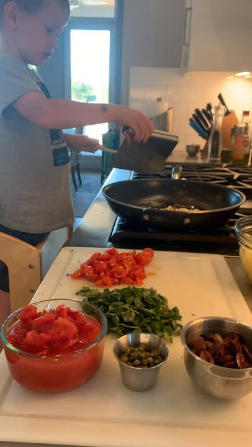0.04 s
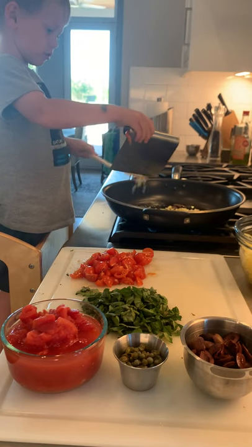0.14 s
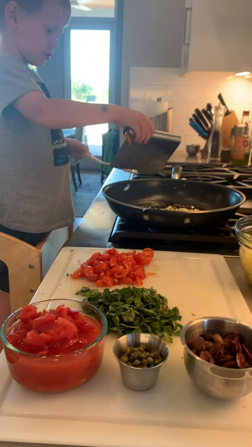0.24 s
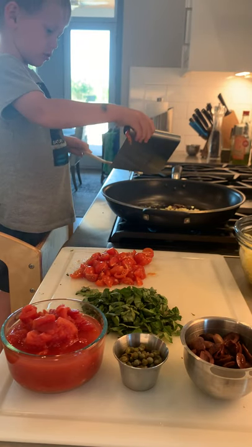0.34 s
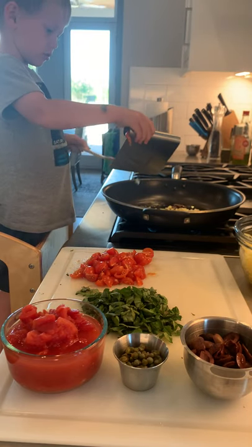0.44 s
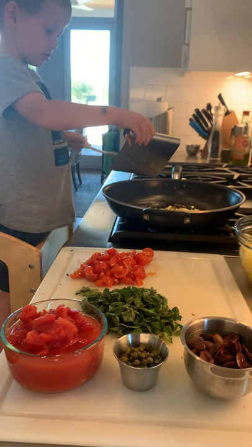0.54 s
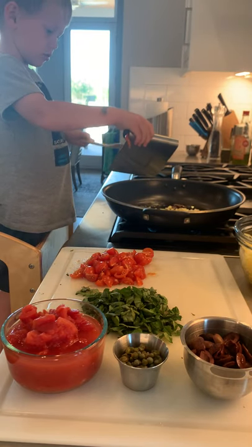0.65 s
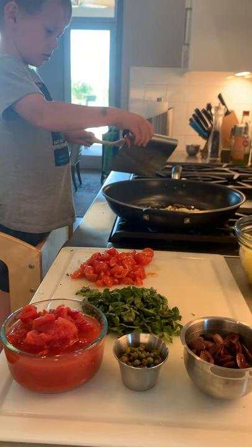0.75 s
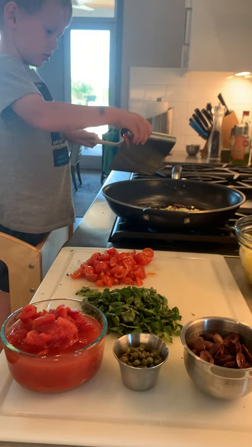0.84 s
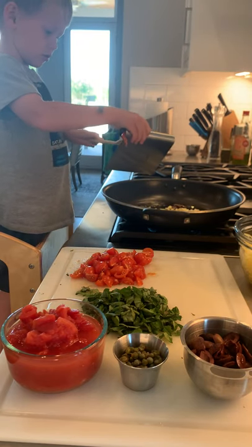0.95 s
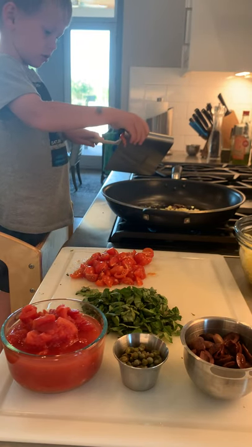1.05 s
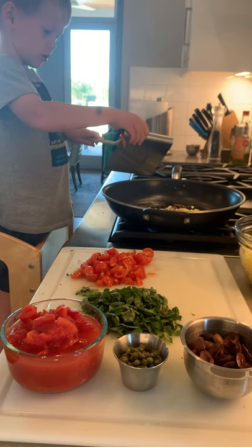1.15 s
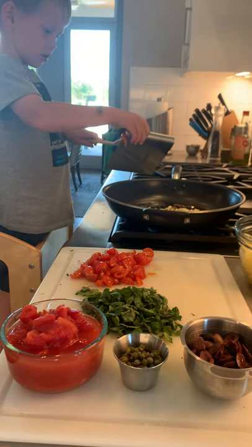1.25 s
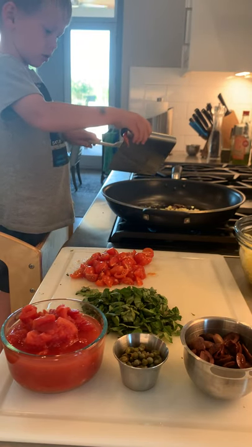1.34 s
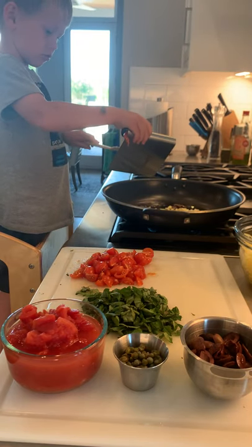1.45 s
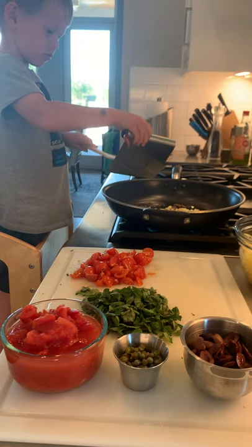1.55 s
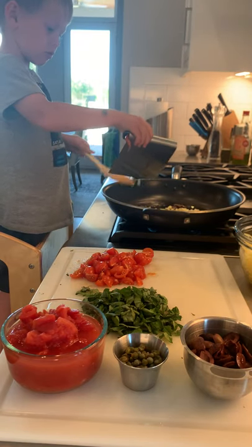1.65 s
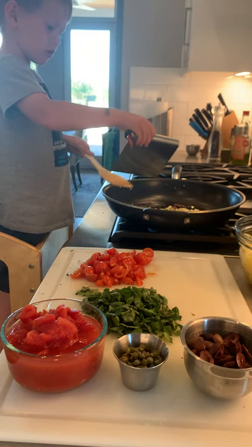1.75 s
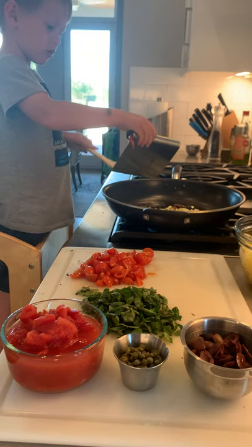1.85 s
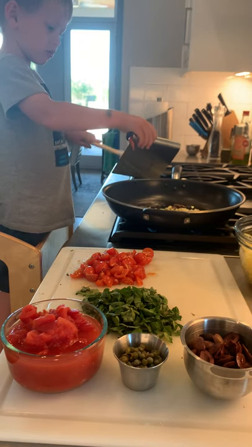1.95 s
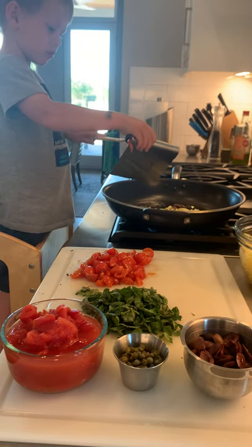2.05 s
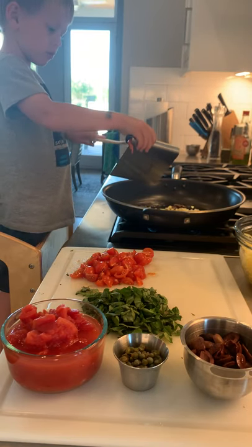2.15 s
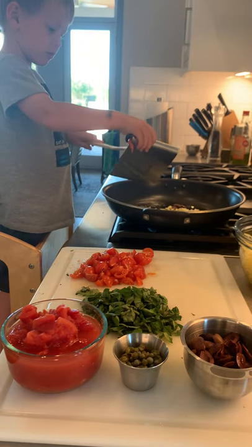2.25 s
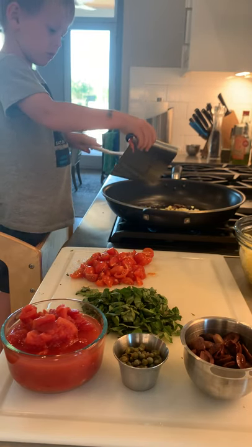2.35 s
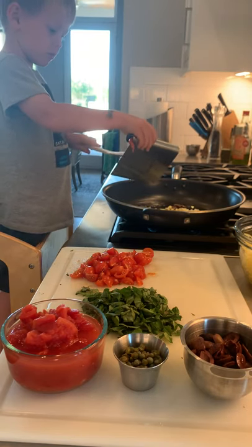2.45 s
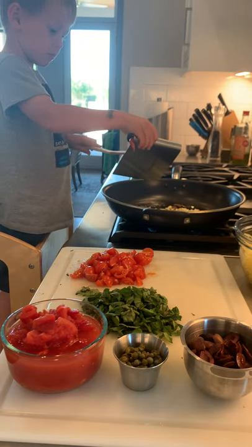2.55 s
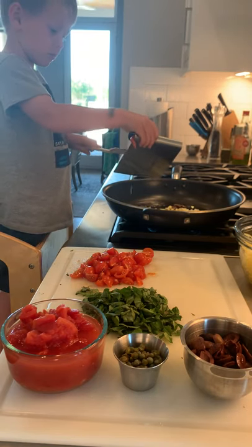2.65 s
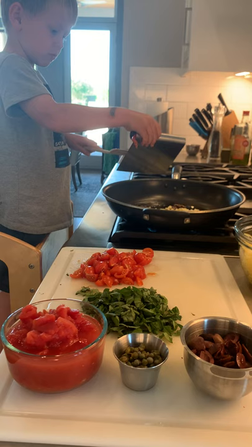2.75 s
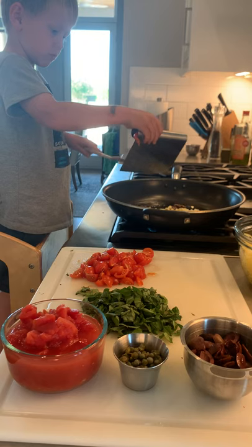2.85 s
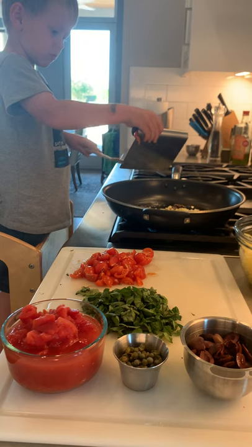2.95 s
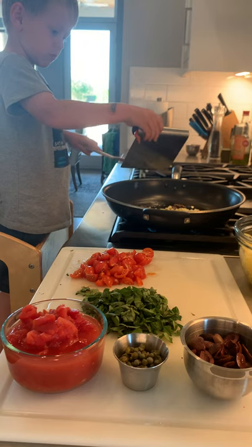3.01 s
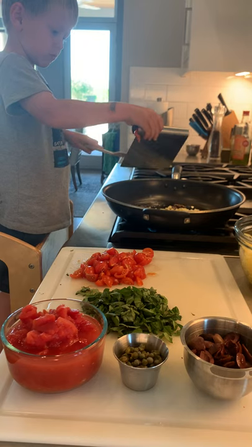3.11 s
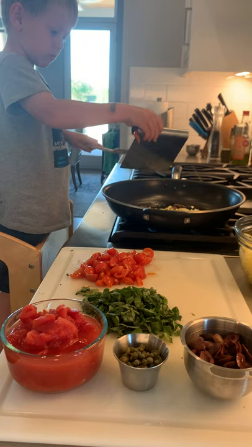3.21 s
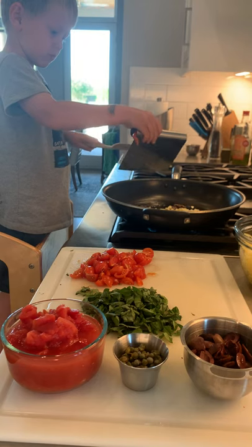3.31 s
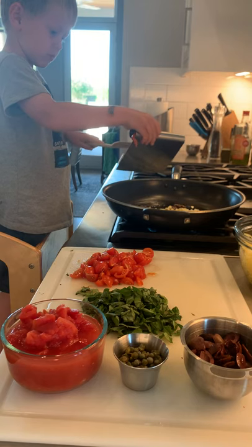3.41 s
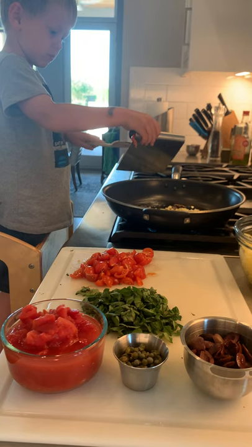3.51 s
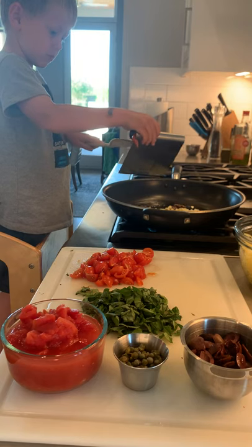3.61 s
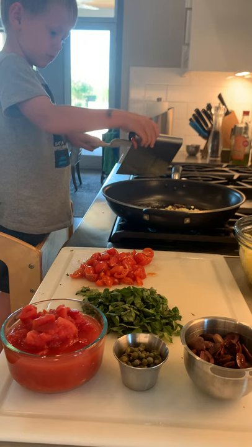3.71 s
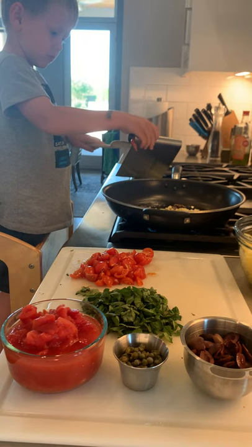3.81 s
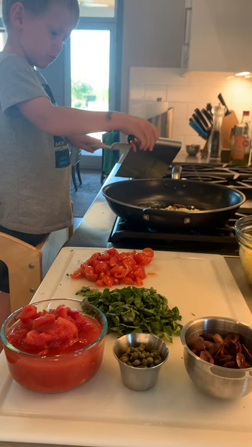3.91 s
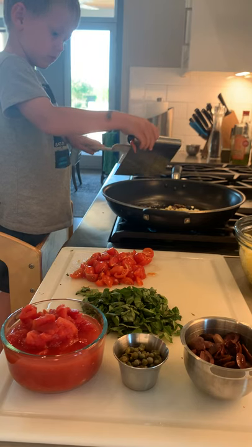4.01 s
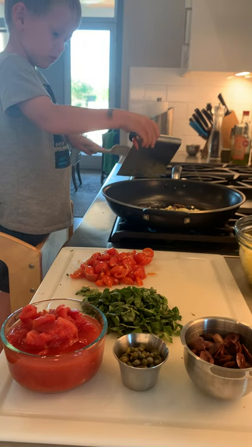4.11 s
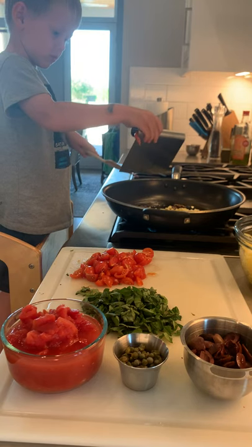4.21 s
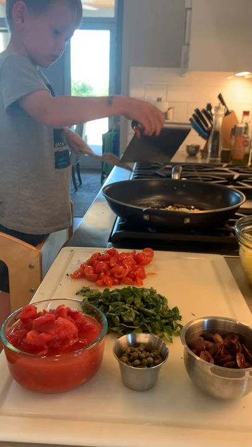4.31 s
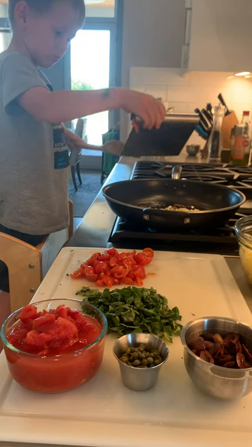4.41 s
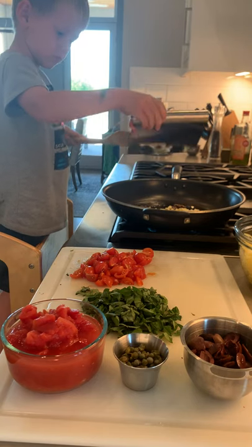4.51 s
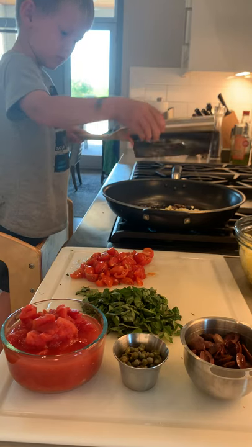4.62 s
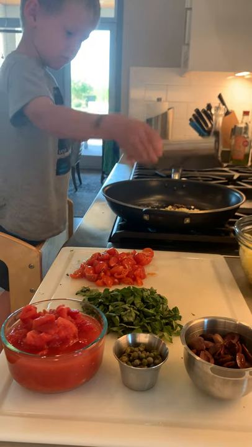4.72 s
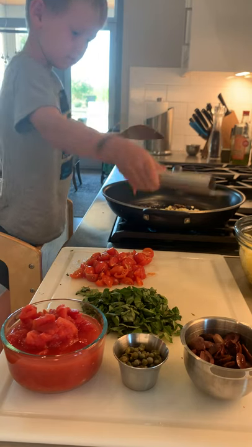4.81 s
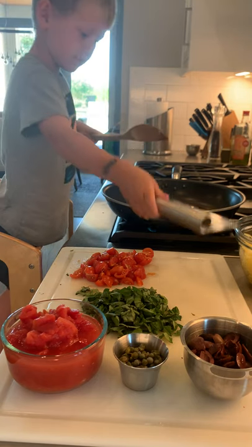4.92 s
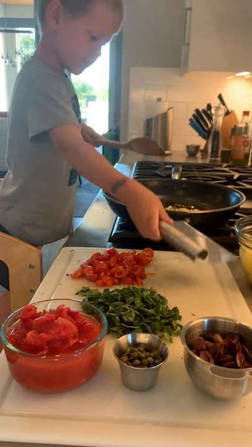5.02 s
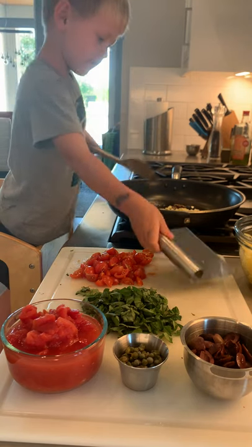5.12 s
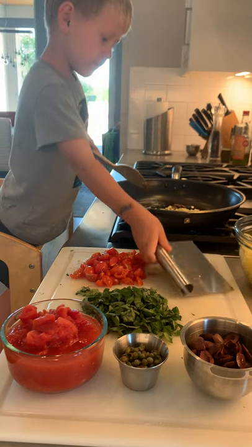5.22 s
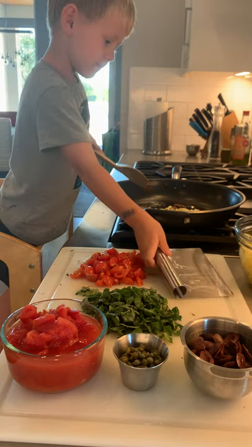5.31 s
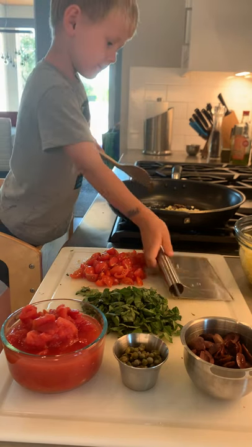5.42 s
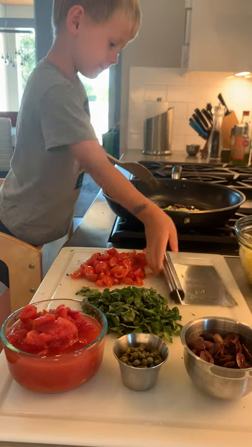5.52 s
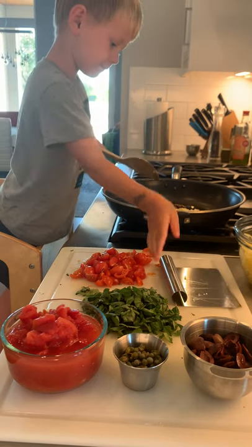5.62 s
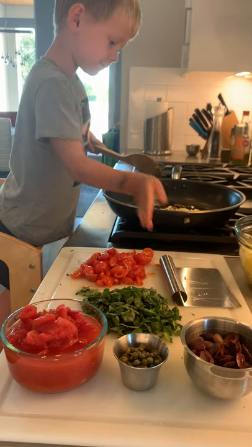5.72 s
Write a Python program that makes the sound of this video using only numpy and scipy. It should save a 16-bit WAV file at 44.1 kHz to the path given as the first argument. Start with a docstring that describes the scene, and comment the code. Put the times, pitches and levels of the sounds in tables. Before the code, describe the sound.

Over a faint house rumble, soft gritty strokes and irregular ticks sound on a thin steel blade, building to a quick cluster of bright taps. Quieter scrapes continue among three dull, distant wooden knocks, the first clearly loudest. A small ware rattle and a barely audible thin ring lead to the loud metallic clatter and thud of the scraper landing on a board. The room is echoing; the stereo microphone is near the board.

```python
"""A home kitchen over a low house rumble. From the start a wooden spoon wipes and taps a steel scraper: grains
and blows ring the held blade's modes, and a thin high ring joins the taps at 2.0 s. Three dull wooden knocks
follow further off, each with two rebounds, then a rattling clink of ware and at 4.96 s a lower thin ring.
Last the scraper is laid on a chopping board, where it slides and clatters flat, adding the board's thud.
Dense wall echoes follow every source except the thin rings; two microphone ports hear it all."""
import sys
import numpy as np
from scipy import signal
from scipy.fft import rfft, irfft
from scipy.io import wavfile
from scipy.ndimage import uniform_filter1d, map_coordinates

SR = 44100
rng = np.random.default_rng(int(sys.argv[2]) if len(sys.argv) > 2 else 0)


def write(x):
    x = np.atleast_2d(x).T
    wavfile.write(sys.argv[1], SR, np.round(np.clip(x, -1, 1) * 32767).astype(np.int16))


N = 254081

# House noise spectrum. Each row: frequency in Hz, relative level per Hz in dB.
HOUSE_SPECTRUM = [(25, -25.5), (60, 1.5), (120, 2.5), (200, -6), (300, -10.5), (500, -25.5), (750, -28),
                  (1020, -34), (1300, -29.5), (1650, -26), (2100, -44.5), (2800, -44), (4500, -44),
                  (8000, -46.5), (15000, -47)]
# Kitchen reverberation. Each row: frequency in Hz, time to fall 60 dB in seconds.
ROOM_DECAY = [(150, 0.56), (500, 0.58), (1500, 0.8), (4000, 0.76), (10000, 0.35)]
# Microphone ports. Each row: frequency in Hz, phase by which left leads in radians, likeness of the ports
# from 0 to 1, left minus right in dB.
MIC_PORTS = [(0, 0, .998, -.3), (60, -.14, .995, -1.2), (125, -.25, .985, -1.8), (300, -.6, .92, -.3),
             (700, -.6, .62, -2.2), (1700, 0, .55, -3), (2400, 1, .4, -3.5), (3050, 2.3, .75, -2),
             (3700, 1.6, .7, -1), (4300, 2, .7, 0), (5200, 3.14, .92, 0), (7600, 6.1, .94, 0),
             (9400, 6.45, .94, 0), (11300, 9.3, .96, 0), (13400, 9.55, .96, 0), (15000, 12.4, .99, 0)]
# Band centres in Hz for colouring each contact; the band at 2100 Hz is the level reference.
BAND_CENTRES_HZ = [45, 200, 800, 2100, 3900, 6500, 9500, 14500]
# Treble of each kind of contact against the reference band, before slope and lift. Each entry: level in dB
# at 3-5 kHz, at 5-7.5 kHz, at 8-11 kHz and above 11 kHz.
TREBLE_DB = dict(tap=(-5, 1, -7.5, -2.5), wipe=(-2, -1, -4.5, -12.5), swing=(0, -3, 4, 19),
             knock=(-6, -12.5, -26, -41), clink=(1.5, 1, -7, -18), landing=(-4, -1.2, -1, -5),
             slide=(-3, 0.5, -3, -8))

# Modes of each body. Each row: frequency in Hz, level in dB before chance and favouring,
# time to fall 60 dB in seconds before damping.
WOOD_MODES = [(590, -4, 0.13), (811, -12, 0.047), (1070, 6, 0.032), (1294, 4.5, 0.041), (1507, 3.5, 0.038),
              (1716, 3.5, 0.073), (1910, -5, 0.048), (2030, 0, 0.12), (2540, -1, 0.06), (3260, 0, 0.03),
              (4780, -31, 0.033)]  # something wooden across the room
WARE_MODES = [(672, -4, 0.037), (886, -3, 0.096), (1105, 1, 0.075), (1250, 3, 0.037), (1526, -4.5, 0.034),
              (2046, 8, 0.083), (2566, 3.5, 0.14), (3340, -16, 0.056), (3750, -3, 0.06), (4140, 3.5, 0.19),
              (4230, -3, 0.13), (4730, 6, 0.052), (5360, 8, 0.058), (5680, 1, 0.12), (5760, -12, 0.04),
              (7450, 1.5, 0.067), (9350, 1, 0.06), (12300, -7, .06)]  # ware across the room
HELD_MODES = [(601, -7, 0.11), (726, -6.5, 0.076), (872, -2, 0.15), (961.4, 1, 0.22), (1074, -3, 0.093),
              (1210, -4, 0.0785), (1435, -1.5, 0.029), (1583, 0.5, 0.11), (1830, -5, 0.06),
              (2003, -2.5, 0.13), (2222, 10, 0.04), (2443, 3.5, 0.075), (2650, -8.5, 0.051),
              (3350, -2.5, 0.083), (3660, 2.5, 0.089), (3987, 5.5, 0.084), (3987, 0, 0.038),
              (4825, 1, 0.022), (6190, -4.5, 0.11), (6510, -2, 0.19), (7280, 2, 0.03), (8340, 1.5, 0.09),
              (9220, 0, 0.25), (10110, 6, 0.26), (13080, -22, 0.067)]  # blade held in the hand
THIN_MODES = [(2190, -5, 0.72), (3600, 7, 0.57), (4936, 13, 0.16), (5860, 0, 0.36), (7450, -8, .12),
              (8550, -18, 0.33)]  # thin, mostly long rings of the blade
LAID_MODES = [(122.5, 3, 0.22), (87, -4.5, 0.13), (185, -3, 0.15), (232.4, -4.5, 0.11), (341, -12, 0.033),
              (413, 5.5, 0.082), (535, -2, 0.2), (711, -4, 0.056), (859, 6.5, 0.06), (1075, 6.5, 0.049),
              (1411, 5, 0.079), (1513, 8, 0.067), (2065.4, 4.5, 0.16), (2184, 1.5, 0.14),
              (2513, -0.5, 0.36), (2840, -4, 0.17), (3146, 6, 0.21), (3330, 1, 0.25), (3804, 0.5, 0.27),
              (4230, -5.5, 0.25), (5400, -18, 0.044), (6030, 9, 0.066), (6600, 0, 0.089), (7360, -8, 0.09),
              (8200, 5, 0.08), (8570, -6, 0.1), (8990, -10, 0.13), (11100, 0, 0.051), (12800, -14, 0.064)]  # blade on the chopping board

# Dull knocks across the room. Each row: start in seconds, peak at 1.5-3 kHz in dB, level against it at
# 0.5-1.3 kHz in dB, treble slope in dB per octave, favoured mode in Hz, rebound spacing in ms.
KNOCK_EVENTS = [(2.3895, -31.5, -2, -4.5, 1645, 9.1), (3.1309, -54.5, 5, -16.5, 1310, 6.4),
                (3.9683, -54.5, 9, -17, 596, 8.9)]
# Contacts of the rattling clink. Each row: start in seconds, peak at 1.5-3 kHz in dB, treble slope in dB
# per octave, contact in ms.
CLINK_EVENTS = [(4.511, -45.5, -4, 3.5), (4.5255, -52.5, 2, 21), (4.5407, -53.5, -3.5, 25),
                (4.5793, -63, -0.5, 80), (4.699, -61.5, -1, 71)]
# Spoon wiping along the blade through garlic. Each row: start in seconds, peak at 1.5-3 kHz in dB, level
# against it at 0.5-1.3 kHz in dB, treble slope in dB per octave, stroke held in ms, favoured mode in Hz.
WIPE_STROKES = [(0.015, -63, -4, -7.5, 66, 1760), (0.142, -60.5, -2, -1, 3.2, 2460),
                (0.19, -56, -1.5, -9, 25, 1820), (0.24, -67.5, 7, -3.5, 29, 1830),
                (1.1292, -72, 19, 5.5, 6.2, 980), (1.2439, -68.5, 10.5, 1, 30, 1530),
                (1.35, -60.5, -1, -5.5, 4, 1520), (1.5443, -60.5, -26, -2, 30, 1360),
                (1.70, -50.5, 9.5, 2.8, 300, 4100), (2.02, -50, 4, -10, 6.6, 2380),
                (2.262, -55.5, -5, -3.5, 9.9, 2600), (2.3274, -51, 4, -2, 6.8, 1870),
                (2.757, -64, -3, 0.5, 50, 1570), (3.0054, -67.5, -15, -1.5, 3.7, 1620),
                (3.247, -66.5, -19, 4, 5, 1320), (4.098, -67.5, -32.5, 2, 4.3, 1590),
                (4.853, -59.5, -0.5, -4.5, 5, 1300)]
# Spoon blows on the held blade. Each row: start in seconds, peak at 1.5-3 kHz in dB, level against it at
# 0.5-1.3 kHz in dB, treble slope in dB per octave, contact in ms, favoured mode in Hz.
TAP_BLOWS = [(0.105, -52, -10, -18, 8.7, 1850), (0.2232, -65.5, -21, -1.5, 2.5, 6460),
             (0.766, -59, -11, -2, 0.6, 14300), (1.0522, -46, -2, -8.5, 3.6, 2200),
             (1.1095, -51, 3, -4, 5.6, 928), (1.4108, -43.5, 2, -7, 1.45, 2240),
             (1.6714, -27, -10.5, 0.5, 0.97, 4140), (1.677, -30.5, -5, 0.5, 4.4, 2380),
             (1.8729, -45, 6.5, -11, 11, 1030), (1.8998, -30, -9, -12.5, 2.5, 1970),
             (1.9124, -38, -8, -16, 4.7, 2190), (1.921, -34.5, -9, -19, 6, 2180),
             (1.9975, -38.5, -7, -8, 3.8, 2440), (2.015, -44, -5.5, -19, 17, 2250),
             (2.3445, -55, -10, -3, 4, 4020)]
# Thin rings of the blade, one high among the taps, one lower later. Each row: start in seconds, peak at
# 1.5-3 kHz in dB, level against it at 0.5-1.3 kHz in dB, treble slope in dB per octave, contact in ms,
# favoured mode in Hz.
THIN_RINGS = [(2.003, -80.5, -20.5, 9, 8, 8600), (4.955, -73, -27, -10.5, 40, 3630)]
# Pressure points of the slide on the board. Each row: time in seconds, rms level in dB at 1.5-3 kHz,
# treble slope in dB per octave.
SLIDE_POINTS = [(5.228, -78, -5), (5.244, -46.5, -2), (5.29, -47, -3.5), (5.35, -55, -14), (5.40, -54, -9),
                (5.45, -48.5, -3.5), (5.479, -40.5, 0), (5.53, -42, -4.5), (5.56, -60, 17.5)]
# Blade striking the board. Each row: start in seconds, peak at 1.5-3 kHz in dB, level against it at
# 0.5-1.3 kHz in dB, treble slope in dB per octave, contact in ms, favoured mode in Hz,
# board thud against the peak at 90-500 Hz in dB.
BOARD_LANDINGS = [(5.225, -33, -10, -0.5, 12.6, 2200, -32), (5.2571, -32.5, -23, -5.5, 7.1, 2480, -21),
                  (5.2816, -37.5, -8, -11, 20.4, 2210, -0.5), (5.4054, -45, -9, -1.5, 14, 1390, -15),
                  (5.473, -29, -11.5, -7, 35, 1460, -32), (5.5381, -31.5, 11, -4, 7.9, 432, 3),
                  (5.5477, -18.5, -9, -2, 1.8, 1550, -6), (5.5526, -20.5, -31, -6, 7.7, 6800, -27),
                  (5.5559, -24.5, 7.5, 0, 3.4, 2053, 4.5), (5.5648, -21.5, -27, 1.5, 1.75, 8700, -3.5),
                  (5.5715, -25.5, -31, 1, 4, 2000, -15), (5.5784, -28.5, -26, -3, 2.4, 6600, -13),
                  (5.5812, -20.5, -40, -5.5, 4.6, 2070, -8.5), (5.612, -29.5, -26, -9.5, 15, 2470, -4),
                  (5.65, -39.5, -3, -4, 16, 2070, -3)]

HOUSE_DB = -53  # before its bands wander
NEARBY_FROM_HZ, NEARBY_DB = 1700, 4.0
PATH_DRIFT_MS = 0.019  # spread of the wander in path delay
MIC_TOP_HZ = 15900
LEAD_IN = 1024  # samples that keep the band edges from wrapping round
SPOT_LIFT_DB, SPOT_OCTAVES = 9, 0.222  # a treble band rings louder when the favoured mode lies in it
SOFT_PER_DB = 0.06  # smoothing of the push per dB of falling treble slope
KNOCK_MS, REBOUND_DB = 1.2, -5  # contact; level of each rebound against the hit before it
CLINK_LOW_DB, CLINK_SPOT_HZ = 5, 1208
WIPE_FADE_MS = 32
SLIDE_LOW_DB, SLIDE_THUD_DB, SLIDE_SPOT_HZ = -4.5, -5, 1364


def undb(db):
    """Decibels to a linear gain."""
    return 10 ** (np.asarray(db) / 20)


def split(x, centres_hz):
    """Overlapping bands that add up to x, crossing on a log-frequency axis."""
    log_hz = np.log(np.arange(len(x) // 2 + 1) * SR / len(x) + 1)
    shares = [np.interp(log_hz, np.log(centres_hz), row) for row in np.eye(len(centres_hz))]
    return irfft(rfft(x) * np.array(shares), len(x))


def walk(rate):
    """Random levels held 1 / rate seconds and slewed twice; spread near 1."""
    hold = int(SR / rate)
    steps = np.repeat(rng.standard_normal(N // hold + 1), hold)
    return 1.34 * uniform_filter1d(uniform_filter1d(steps, hold), hold)[:N]


def house():
    """Rumble of appliances and air: shaped noise whose bands wander a little in level."""
    hz, db = np.transpose(HOUSE_SPECTRUM)
    log_hz = np.log(np.arange(N // 2 + 1) * SR / N + 1)
    shape = undb(np.interp(log_hz, np.log(hz), db))
    noise = irfft(rfft(rng.standard_normal(N)) * shape, N)
    bands = split(noise / noise.std(), np.geomspace(40, 14000, num=16))
    return undb(HOUSE_DB) * sum(band * undb(2.4 * walk(4.92)) for band in bands)


def walls(x):
    """Dense echoes swell in a few ms and decay by band; a slow random wander in path delay blurs them."""
    t = np.arange(32768) / SR
    hz, t60 = np.transpose(ROOM_DECAY)
    bands = split(rng.standard_normal(len(t)), hz)
    tail = np.sum(bands * undb(-60 * t / t60[:, None]), axis=0)
    swell = 1 - np.exp(-(t / 0.0069) ** 2)
    wet = signal.fftconvolve(x, tail * swell / np.sqrt(SR))[:N]
    drift = PATH_DRIFT_MS * SR / 1000 * walk(25)
    return map_coordinates(wet, [np.arange(N) + drift], mode="mirror")


def nearby(x):
    """Reflections from hob and counter within a few ms; long waves are left out as both ports hear them alike."""
    t = np.arange(512) / SR
    echoes = rng.standard_normal(len(t)) * np.exp(-t / 0.0055)
    x = signal.sosfilt(signal.butter(1, NEARBY_FROM_HZ, "high", fs=SR, output="sos"), x)
    return signal.fftconvolve(x, echoes / np.sqrt(np.sum(echoes ** 2)))[:N]


def single(a):
    """Single precision, enough for the modes and faster."""
    return np.asarray(a, np.float32)


def ringing(modes, spot_hz, uneven, crack_db, crack_ms, damp=1, flex=0, waver=0, favour_db=9, size=14336):
    """What one grain rings: modes, strongest near the touched spot's favourite, and a short noisy crack.
    Pressing shortens the ring (damp), bending slides its pitches (flex, share per s), a moving grip
    makes them waver (share); uneven spreads each mode's neighbours (share)."""
    t = np.arange(size, dtype=np.float32) / SR
    # an uneven plate splits each mode into six close neighbours
    hz, db, t60 = np.repeat(modes, 6, axis=0).T[:, :, None]
    level_chance, pitch_chance, phase_chance, flex_chance = rng.standard_normal((4, len(hz), 1))
    near_db = favour_db * np.exp(-(np.log(hz / spot_hz) / 0.08) ** 2)
    grip = np.interp(t, np.linspace(0, t[-1], 16), rng.standard_normal(16))
    wavered_time = t + waver * np.cumsum(grip) / SR
    turn = single(2 * np.pi * hz * (1 + uneven * pitch_chance)) * single(wavered_time)
    turn = turn + single(np.pi * hz * flex * flex_chance) * t ** 2
    decay = np.exp(single(-np.log(1000) * damp / t60) * t)
    rings = np.sin(turn + single(3 * phase_chance)) * decay
    body = single(undb(db + near_db + 2.07 * level_chance))[:, 0] @ rings
    # the crack stands for the many modes that die at once; it falls 64.6 dB in crack_ms
    crack = undb(crack_db - 64600.0 * t / crack_ms) * rng.standard_normal(size)
    return body + crack


def grit(grit_db, size):
    """A chatter of grains of uneven size, on about 15 percent of the samples."""
    sizes = undb(grit_db * rng.exponential(size=size))
    return rng.standard_normal(size) * sizes * (rng.random(size) < .15)


def colour(thud_db, low_db, slope_db, spot_hz, treble):
    """Level of each band against the 1.5-3 kHz band; the slope runs up to the 8-11 kHz band."""
    treble_hz = np.array(BAND_CENTRES_HZ[4:])
    octaves = np.log2(np.minimum(treble_hz, BAND_CENTRES_HZ[6]) / BAND_CENTRES_HZ[3])
    lift_db = SPOT_LIFT_DB * np.exp(-(np.log2(treble_hz / spot_hz) / SPOT_OCTAVES) ** 2)
    return np.array([thud_db - 20.5, thud_db, low_db, 0, *(treble + slope_db * octaves + lift_db)])


def contacts(events, modes, treble, blow, grit_db, size=16384, **body):
    """Each contact is a blow and a chatter of grains that ring the modes; rows end with hold ms and thud dB."""
    out = np.zeros(N + size)
    ms_in = np.arange(10240) * 1000 / SR
    for s, peak_db, low_db, slope_db, ms, spot_hz, hold_ms, thud_db in events:
        ms = max(ms, .5)
        fade = np.exp(-(np.maximum(ms_in - hold_ms, 0) / ms) ** 2)
        onset = np.clip(blow + 3 * ms_in / ms, 0, 1)
        push = 0.26 * grit(grit_db, size=len(ms_in)) * fade * onset
        push[0] = blow
        # a dull contact is a longer, rounder push
        soft = np.clip(-slope_db * SOFT_PER_DB, 0, .9)
        push = signal.lfilter([1], [1, -2 * soft, soft ** 2], push)
        struck = signal.fftconvolve(ringing(modes, spot_hz, **body), push)[:size]
        bands = split(np.roll(struck, LEAD_IN), BAND_CENTRES_HZ)
        gains = undb(peak_db + colour(thud_db, low_db, slope_db, spot_hz, treble))
        at = int(s * SR)
        out[at:at + size] += (gains / np.abs(bands).max(axis=1)) @ bands
    return out[LEAD_IN:N + LEAD_IN]


def without_board(rows):
    """No board under the body: adds no hold and a thud 10 dB below the low band."""
    return [(*row, 0, row[2] - 10) for row in rows]


def knocks():
    """Dull wooden hits, each bouncing twice at an even spacing and losing level."""
    hits = []
    for s, db, low, slope, hz, rebound_ms in KNOCK_EVENTS:
        for k in range(3):
            hits.append((s + k * rebound_ms / 1000, db + k * REBOUND_DB, low, slope, KNOCK_MS, hz))
    return contacts(without_board(hits), WOOD_MODES, TREBLE_DB["knock"], blow=1.0, grit_db=-1.0,
                    uneven=0.024, crack_db=21.0, crack_ms=97, waver=0.011)


def clinks():
    """Ware rattles: a few contacts ring its modes, the later ones chattering for longer."""
    rattle = [(s, db, CLINK_LOW_DB, slope, ms, CLINK_SPOT_HZ) for s, db, slope, ms in CLINK_EVENTS]
    return contacts(without_board(rattle), WARE_MODES, TREBLE_DB["clink"], blow=1.0, grit_db=5.5,
                    uneven=0.0132, crack_db=20.5, crack_ms=52, flex=0.076, waver=0.0118)


def wipes():
    """Spoon strokes: grains without a blow, on a blade damped by the pressing spoon."""
    strokes = [(s, db, low, slope, WIPE_FADE_MS, hz, held_ms, low - 10)
               for s, db, low, slope, held_ms, hz in WIPE_STROKES]
    return contacts(strokes, HELD_MODES, TREBLE_DB["wipe"], blow=0, grit_db=3.5,
                    uneven=0.047, crack_db=31.5, crack_ms=10, damp=3.0)


def taps():
    """Spoon blows ring the held blade, whose pitches slide as it bends and waver with the grip."""
    return contacts(without_board(TAP_BLOWS), HELD_MODES, TREBLE_DB["tap"], blow=0.92, grit_db=4.0,
                    uneven=0.024, crack_db=25, crack_ms=30, flex=0.25, waver=0.0059)


def thin_rings():
    """Thin, long rings of the blade, its modes excited by a soft push of grains without a blow."""
    return contacts(without_board(THIN_RINGS), THIN_MODES, TREBLE_DB["swing"], blow=0, grit_db=-43.0,
                    uneven=0.00145, crack_db=-3.0, crack_ms=18)


def slide():
    """Grains under the moving edge ring the laid blade; pressure sets their level and brightness."""
    s, level_db, slope_db = np.transpose(SLIDE_POINTS)
    at = int(s[0] * SR)
    t = np.arange(at, int(s[-1] * SR)) / SR
    ring = ringing(LAID_MODES, SLIDE_SPOT_HZ, uneven=0.0239, crack_db=26.5, crack_ms=21.0,
                   damp=1.3, favour_db=14.5)
    bands = split(np.roll(ring, LEAD_IN), BAND_CENTRES_HZ)
    bands = bands / np.linalg.norm(bands, axis=1, keepdims=True)
    knots = np.array([db + colour(SLIDE_THUD_DB, SLIDE_LOW_DB, slope, SLIDE_SPOT_HZ, TREBLE_DB["slide"])
                      for db, slope in zip(level_db, slope_db)])
    grains = grit(2.0, size=len(t))
    push = grains / grains.std() * undb([np.interp(t, s, band_db) for band_db in knots.T])
    sound = signal.fftconvolve(bands, push, axes=1).sum(axis=0)
    return np.concatenate([np.zeros(at), sound, np.zeros(N)])[LEAD_IN:N + LEAD_IN]


def landings():
    """The blade clatters onto the board: blows and grains ring its laid modes over the board's thud."""
    drops = [(*row, 0, thud_db) for *row, thud_db in BOARD_LANDINGS]
    return contacts(drops, LAID_MODES, TREBLE_DB["landing"], blow=1.0, grit_db=3.0,
                    uneven=0.0096, crack_db=30.0, crack_ms=39.3, waver=0.006)


def scene():
    """Two unrelated paths: direct sound on the first, near reflections on the second, walls and house on both."""
    knock, clink = knocks(), clinks()
    wipe, tap = wipes(), taps()
    laid = slide() + landings()
    direct = knock + clink + wipe + tap + thin_rings() + laid
    # level of each source into the wall echoes, in dB
    send = undb(7.5) * knock + undb(16.0) * clink + undb(11.5) * wipe + undb(7) * tap + undb(4.5) * laid
    first = direct + walls(send) + house()
    second = undb(NEARBY_DB) * nearby(direct) + walls(send) + house()
    return np.array([first, second])


def record(dry):
    """Two ports hear the paths as sum and difference, with phase and level offsets by frequency; the top is cut."""
    hz, *columns = np.transpose(MIC_PORTS)
    bin_hz = np.arange(N // 2 + 1) * SR / N
    lead, like, pan_db = (np.interp(bin_hz, hz, column) for column in columns)
    like = np.clip(like, 0, 1)
    shared, apart = rfft(dry) * np.sqrt([1 + like, 1 - like]) / np.sqrt(2)
    # each port takes half of the phase lead and half of the level offset
    turn = np.exp(.5j * lead) * undb(pan_db / 2)
    ports = irfft([(shared + apart) * turn, (shared - apart) / turn], N)
    return signal.sosfilt(signal.ellip(10, .2, 80, MIC_TOP_HZ, fs=SR, output="sos"), ports)


dry = scene()
out = record(dry)
write(out)
```